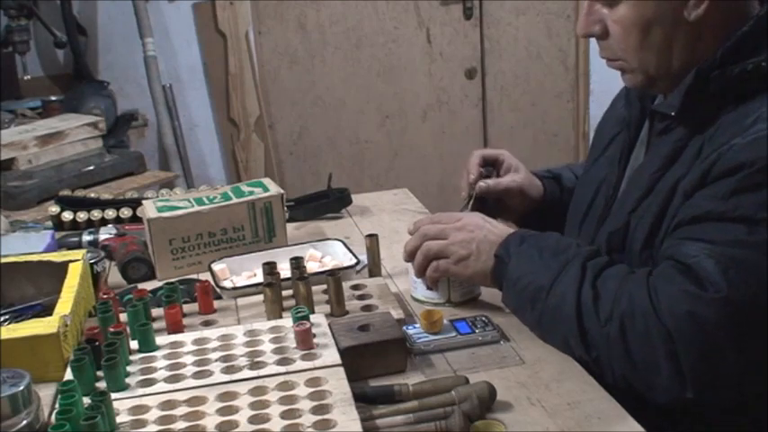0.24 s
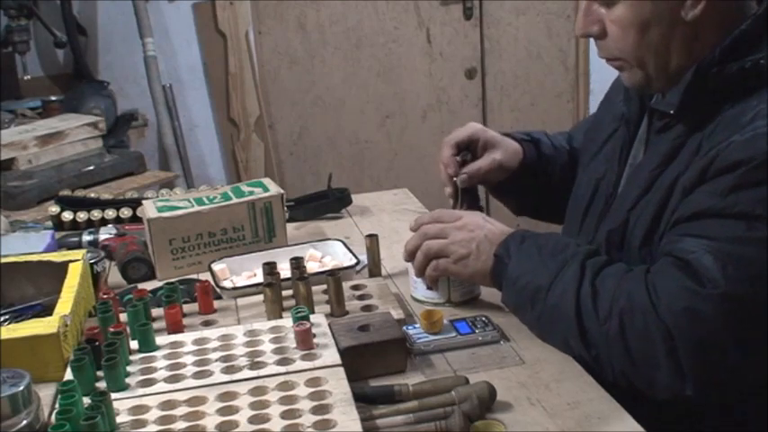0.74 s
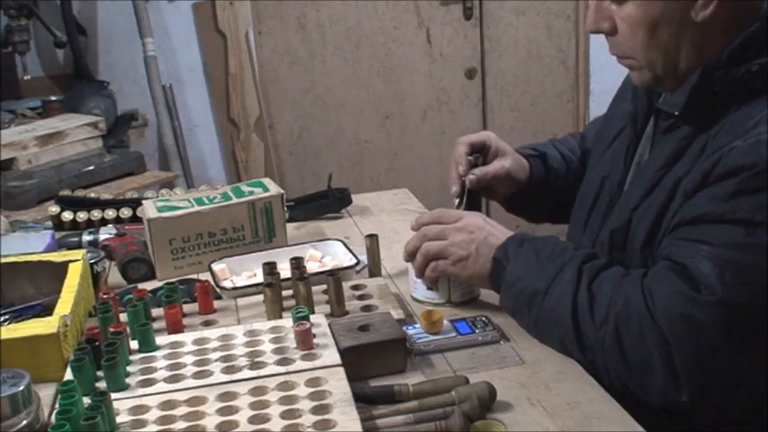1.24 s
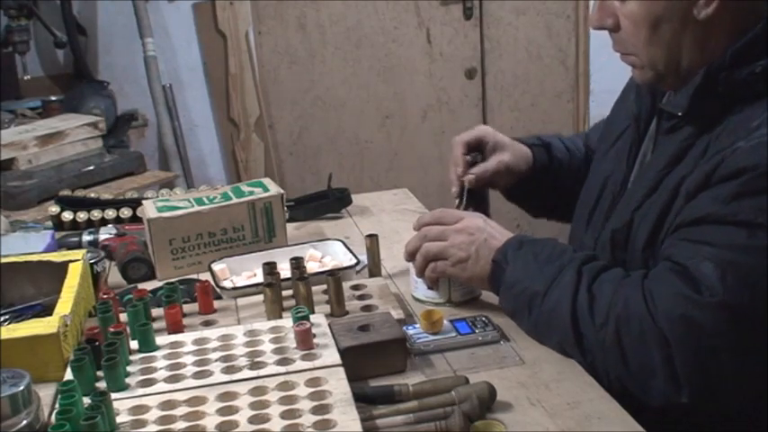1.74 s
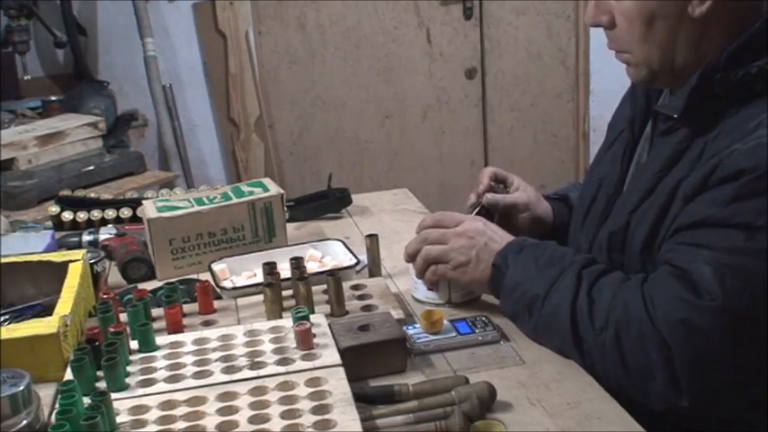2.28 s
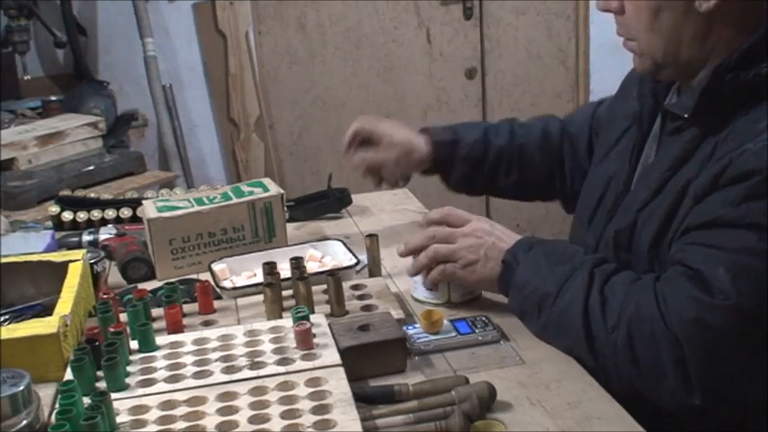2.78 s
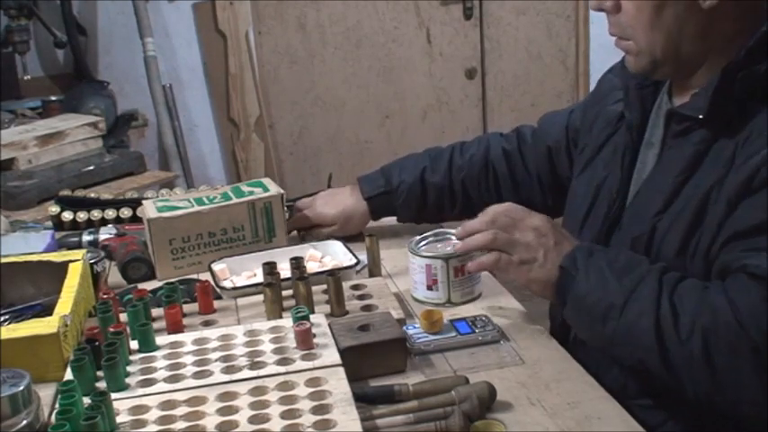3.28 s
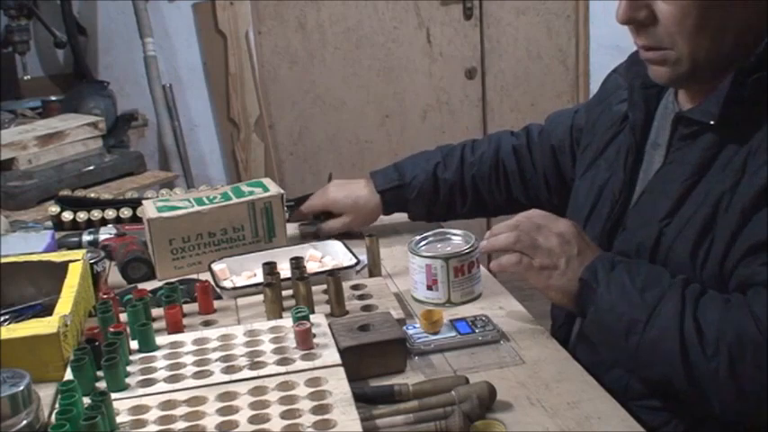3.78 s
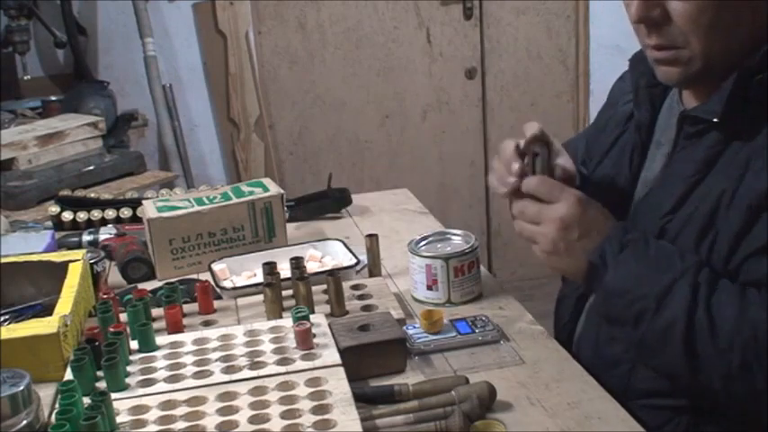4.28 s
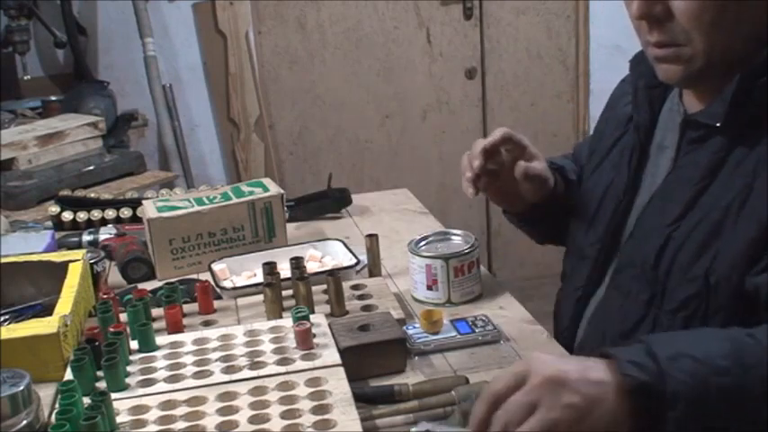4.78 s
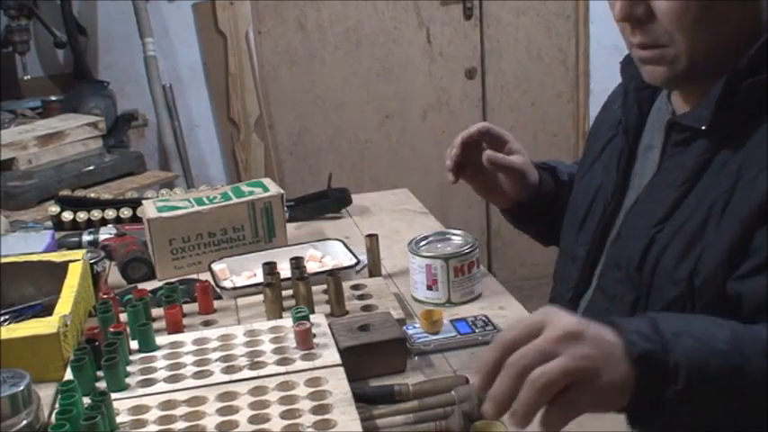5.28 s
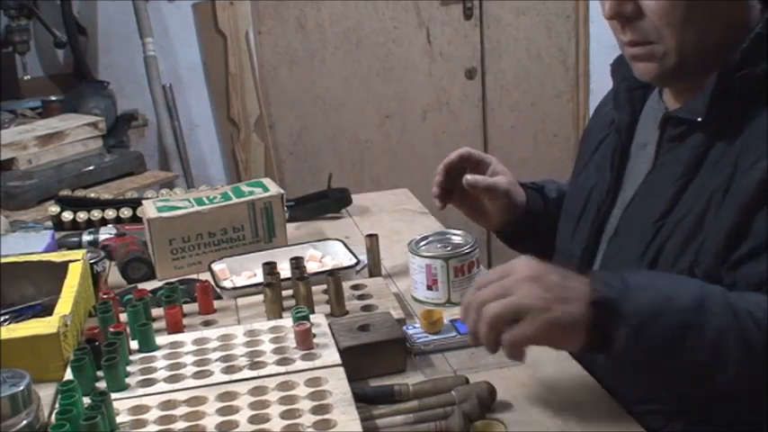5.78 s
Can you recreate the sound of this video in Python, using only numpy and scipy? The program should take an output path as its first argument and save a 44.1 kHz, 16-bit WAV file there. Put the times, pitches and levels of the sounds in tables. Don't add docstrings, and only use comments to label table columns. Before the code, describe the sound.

In a small workshop, heard by a camcorder about two metres away, a knife blade pries at a tin lid. A bright metallic snap at 0.1 s is followed by a duller lid bump at 0.2 and a lower snap at 0.43; the blade ring is quickly choked. Faint touches and scrapes lead to another ringing slip and bump at 1.5-1.6, soft skids at 1.8, and the hardest crack and hollow bump at 2.05-2.1. A weak double clink rings thinly at 2.5. A quilted sleeve rustles, louder by 3 s. The knife lands on wood at 3.17, 3.38 and 3.6, each knock rocking briefly. Cloth swishes from 4.05 to 4.5, ending with tiny clasp ticks. A wooden tool lands nearer at 5.08, its other end at 5.23. Soft rustling, room tone, hiss and a faint machine whine continue, extra thin tones joining after 4.6.

```python
import sys
import numpy as np
from scipy import signal
from scipy.fft import rfft, irfft, next_fast_len
from scipy.io import wavfile
from scipy.ndimage import uniform_filter1d

SR = 44100
rng = np.random.default_rng(int(sys.argv[2]) if len(sys.argv) > 2 else 0)


def to_wav(sig):
    pcm = np.clip(np.atleast_2d(sig), -1, 1) * 32767
    pcm = np.round(pcm).astype(np.int16)
    wavfile.write(sys.argv[1], SR, pcm.T)


def volts(x):
    e = np.asarray(x, float) / 20
    return 10 ** e


N = 266275
TAIL = 32768

# hz, side_minus_mid_db
ROOM_SIDE = [(25, -36), (60, -25.5), (110, -20.5), (200, -16.5), (380, -21.5), (700, -7), (1290, -20.5),
             (2380, -7.5), (4400, -16.5), (8120, -14), (15000, -24.5)]
# start_s, peak_db, rocking_db
FAR_DROPS = [
    (3.172, -12, -30),
    (3.376, -7, -23.5),
    (3.606, -6.5, -16.5),
]


def on_log(hz, table):
    at_hz, value = np.transpose(table)
    return np.interp(np.log(hz + 1), np.log(at_hz), value)


def unit(x):
    return x / np.sqrt(np.mean(x ** 2))


def noise(colour):
    size = next_fast_len(N)
    spectrum = rfft(rng.standard_normal(size))
    gain = volts(on_log(np.fft.rfftfreq(size, 1 / SR), colour))
    return unit(irfft(spectrum * gain, size)[:N])


def walk(rate_hz):
    hold = int(SR / rate_hz)
    steps = np.repeat(rng.standard_normal(N // hold + 1), hold)
    return unit(uniform_filter1d(uniform_filter1d(steps, hold), hold)[:N])


def add(track, start_s, x):
    i = int(start_s * SR)
    track[i:i + len(x)] += x[:N - i]


def even(x, size):
    spectrum = rfft(x)
    return spectrum / np.sqrt(uniform_filter1d(np.abs(spectrum) ** 2, size))


def room(dry, direct_db, early_db, early_t60_s):
    # hz, t60_s
    room_t60 = [(60, 1), (150, 0.34), (400, 0.31), (1000, 0.34), (2500, 0.33), (6000, 0.31), (13000, 0.26)]
    t, hz = np.arange(TAIL) / SR, np.fft.rfftfreq(TAIL, 1 / SR)
    echo = np.zeros((2, TAIL))
    for centre_hz in 60 * 2. ** np.arange(9):
        share = np.clip(1 - np.abs(np.log2((hz + 1) / centre_hz)), 0, 1)
        band = irfft(rfft(rng.standard_normal((2, TAIL))) * share)
        band[1] *= volts(on_log(centre_hz, ROOM_SIDE))
        late = volts(-60 * t / on_log(centre_hz, room_t60))
        early = volts(early_db - 60 * t / early_t60_s)
        build_up = 1 - np.exp(-t * centre_hz / 1.3)
        echo += band * (late + early) * build_up
    echo[0] = irfft(even(echo[0], size=40)) * np.std(echo[0]) * np.sqrt(TAIL)
    echo[:, TAIL // 2:] = 0
    echo /= np.sqrt(np.sum(echo[0] ** 2))
    echo[0, 0] = volts(direct_db)
    mid, side = signal.fftconvolve(dry[None], echo, axes=1)[:, :N]
    return np.array([mid + side, mid - side])


def blows(rows, body, gain_db, bump_db):
    rise_s = 0.0008
    size = 4096
    out, hz, t = np.zeros(N), np.fft.rfftfreq(size, 1 / SR), np.arange(size) / SR
    for start_s, db, treble_db, bass_db, peak_hz, ms in rows:
        colour_db = on_log(hz, body) + bump_db * np.exp(-np.log2((hz + 1) / peak_hz) ** 2 / 0.18)
        tilt = [(250, bass_db + 22.0), (450, 0.01), (1800, 0.016),
                (3000, treble_db + 27.5), (14000, 1.19 * (treble_db + 27))]
        colour_db += on_log(hz, tilt)
        cepstrum = irfft(np.log(volts(colour_db)))
        cepstrum[1:size // 2] *= 2
        cepstrum[size // 2:] = 0
        envelope = np.minimum(t / rise_s, 1) * np.exp(-1000 * t / max(ms, .3))
        grit = rng.standard_normal(size) ** 3 * envelope
        crunch = irfft(even(grit, size=3) * np.exp(rfft(cepstrum)))[:3500]
        add(out, start_s, crunch * volts(db + gain_db) / np.sqrt(np.sum(crunch ** 2)))
    return out


def ring(modes, strikes, rise_s, choke_s=1):
    out, t = np.zeros(N), np.arange(TAIL) / SR
    hz, db, t60_s = np.transpose(modes)[:, :, None]
    waver_db = 2 * np.resize(walk(45), (len(modes), TAIL))
    sines = volts(db + waver_db - 60 * t / t60_s) * np.sin(2 * np.pi * hz * t)
    choke = volts(-18 * np.clip((t - choke_s) / 0.0061, 0, 1))
    sound = sines.sum(axis=0) * (1 - np.exp(-t / rise_s)) * choke
    for start_s, strike_db in strikes:
        add(out, start_s, volts(strike_db) * sound)
    return out


def floor():
    # hz, level_db
    hiss = [(12, -27.5), (20, -8), (50, 7), (96, -9.5), (248, -5), (513, -6.5), (624, -11.5), (897, -7.5),
            (976, -5.5), (1440, -7), (12800, -24), (14700, -19.5), (16000, -47.5)]
    hiss_db = -62
    side_colour = [(hz, db + on_log(hz, ROOM_SIDE)) for hz, db in hiss]
    side = noise(side_colour) * volts(hiss_db - 9.5)
    return noise(hiss) * volts(hiss_db - 7.5) + side * np.array([[1], [-1]])


def whine():
    # pitch_hz, rms_db
    steady_tones = [(770, -80), (910, -76), (1330, -99), (1513, -86.5), (1680, -92)]
    # pitch_hz, rms_db
    late_tones = [(1147, -81), (2420, -84.5), (2550, -85)]
    late_start_s, fade_in_s = 4.6, 0.14
    t = np.arange(N) / SR

    def tone(hz, db):
        level = np.sqrt(2) * volts(db + 3 * walk(30))
        return level * np.sin(2 * np.pi * hz * t + walk(25))

    late = np.clip((t - late_start_s) / fade_in_s, 0, 1)
    return sum(tone(*row) for row in steady_tones) + late * sum(tone(*row) for row in late_tones)


def sleeve():
    # time_s, swish_db
    arms = [(0.0, -72), (0.09, -73), (0.7, -88.5), (0.94, -75.5), (1.5, -77.5), (2.6, -74), (2.86, -67.5),
            (3.16, -63), (3.95, -72), (4.064, -63.5), (4.49, -63), (4.78, -74), (4.99, -74.5), (5.06, -69),
            (5.74, -78), (6.04, -74)]
    # hz, db_per_hz
    cloth_colour = [(710, -24), (1200, 0), (1910, -2.5), (2060, -1), (7870, -3), (9930, -8.5),
                    (11900, -5.5), (15000, -13)]
    t = np.arange(N) / SR
    swish_db = np.interp(t, *np.transpose(arms))
    dying_away = volts(-51 - 60 * t / 0.33)
    pressure = volts(-70 + 0.4 * (swish_db + 72)) + dying_away
    side = volts(-17) * np.outer([1, -1], noise(cloth_colour))
    cloth = noise([(300, -24.5)] + cloth_colour) + side
    swish = cloth * volts(swish_db + 0.97 * walk(37) + 0.42 * walk(200) + 1.5)
    rub = noise([(80, -28.5), (300, 5), (900, 8.5), (2000, -7.0), (4000, -47.0)])
    return swish + rub * pressure * volts(2.0 * walk(52) - 5.0)


def tin():
    # hz, db_per_hz
    tin_body = [(40, -29), (100, -25.5), (172, -15), (230, -18.5), (290, -4), (600, -5.5), (1200, -1.5),
                (1700, -3.5), (2300, -18.5), (4000, -24), (5700, -23.5), (7600, -27), (10000, -35.5),
                (15000, -43)]
    # start_s, peak_db, treble_db, peak_hz
    rim_slips = [
        (0.097, -6, -5.5, 1790),
        (0.43, -11, -21, 1150),
        (1.513, -7, -22.5, 1640),
        (2.053, -3.5, -19, 1590),
    ]
    # start_s, peak_db, treble_db, peak_hz
    lid_bumps = [
        (0.197, -11.5, -19, 470),
        (0.932, -37.5, -33, 645),
        (0.974, -37, -31.5, 480),
        (1.449, -48, -23, 697),
        (1.591, -18, -20.5, 480),
        (1.852, -24.5, -26.5, 507),
        (2.084, -3, -23.5, 484),
        (2.469, -29.5, -22.5, 1700),
        (2.475, -27.5, -21, 995),
    ]
    # start_s, peak_db, treble_db, peak_hz
    chatter = [(0.104, -12, -0.5, 1650), (0.609, -36.5, -20, 555), (0.644, -39, -20, 572),
               (1.339, -45.5, -37, 680), (1.519, -27, -4, 474), (1.596, -27, -13, 486),
               (1.805, -31, -25, 700), (1.831, -29.5, -20.5, 519), (1.86, -51, -4.5, 479),
               (1.901, -46, -28, 1150), (2.008, -38.5, -14.5, 1170), (2.06, -13, -35.5, 472),
               (2.094, -15.5, -19.5, 484), (2.299, -41, -13.5, 446), (2.48, -31.5, -1.5, 590)]

    def bass_db(db):
        return -2 - 0.63 * (db + 40)

    snaps = [(s, db, treble_db, -36.5, hz, 4.4) for s, db, treble_db, hz in rim_slips]
    bumps = [(s, db, treble_db, bass_db(db), hz, 4.2) for s, db, treble_db, hz in lid_bumps]
    skids = [(s, db, treble_db, bass_db(db), hz, 13.7) for s, db, treble_db, hz in chatter]
    return blows(snaps + bumps, tin_body, 11.4, 8.9) + blows(skids, tin_body, 13.5, 19.7)


def metal():
    # pitch_hz, level_db, t60_s
    lid_modes = [(447, -10.5, .2), (485, -0.5, 0.57)]
    wall_modes = [(791, 0, .55)]
    rim_modes = [(1075, -10.5, .12), (1320, -16, .12), (1425, -8.5, .12), (1508, 4, 0.32), (1635, -7, 0.18),
                 (1660, -7, .16), (1910, -7.5, .2), (2069, -11, 0.091), (2360, -14, .15), (2684, -16, 0.15)]
    bench_modes = [(98, -14, .25), (172.4, -10, .33), (286, 0, .2)]
    # start_s, lid_db, wall_db, rim_db, bench_db
    slips = [(.098, -35.5, -45, -37.5, -58), (0.199, -31.5, -53, -42, -35.5), (.431, -49, -49, -48, -50),
             (.974, -52, -65.5, -73, -59.5), (1.514, -27.5, -32.5, -27.5, -55),
             (1.591, -34, -59, -71, -34.5), (1.805, -56, -70, -69.5, -53), (1.853, -46, -60.5, -65, -53),
             (2.053, -40.5, -59, -27, -47), (2.085, -27, -42.5, -31, -33), (2.3, -57.5, -92, -74, -74),
             (2.475, -53, -65, -58, -70), (3.85, -52.5, -78, -67, -56)]
    # pitch_hz, level_db, t60_s
    blade_modes = [
        [(3654, 0, .3), (5507, -8, .15), (5652, -7, .2), (5900, -5, .12), (6783, -10, .18), (7234, 3, .2),
         (8403, -15, .3)],
        [(3957, -6, .2), (4366, -2, .3), (5889, 2, .17), (6051, -1, .2), (6309, -6, .24), (7031, -6, .22)],
        [(3650, 0, .5), (4463, -7, .2), (6228, -8, .12), (7250, -10, .3)],
        [(5380, 5, .14), (5470, 2, .25), (5523, 2, .28), (5600, 5, .14), (3650, -5, .38), (6955, -11, .3),
         (7208, -8, .25), (4430, -12, .35)],
        [(5496, 4, .08), (5640, 2, .07), (4323, -14, .35), (7601, -4, .1), (2902, -6, .2)],
        [(1745, 6, .25), (2245, -5, .3), (3628, -5, .66), (4384, -7, .3), (4424, -8, .3), (5496, -6, .3),
         (6850, -12, .15), (7176, -17, .2), (9270, -15, .13), (10890, -16, .22)],
    ]
    # start_s, level_db, choke_s
    grips = [
        (.100, -21.5, .097),
        (.198, -40.5, .3),
        (1.514, -43.5, 0.21),
        (1.594, -49, 0.24),
        (2.053, -30, .3),
        (2.476, -46.5, 0.47),
    ]
    start_s, *parts_db = np.transpose(slips)
    parts = (lid_modes, wall_modes, rim_modes, bench_modes)
    chokes_s = (0.067, 1, 1, 1)
    out = np.zeros(N)
    for modes, db, choke_s in zip(parts, parts_db, chokes_s):
        out += ring(modes, zip(start_s, db), 0.00057, choke_s)
    for modes, (grip_s, db, choke_s) in zip(blade_modes, grips):
        out += ring(modes, [(grip_s, db)], 0.009, choke_s)
    return out


def ticks():
    # start_s, peak_db, contact_ms
    clasp_ticks = [
        (2.0218, -55, 0.96),
        (2.798, -51, 7),
        (4.4738, -48, 5.1),
        (4.4994, -68, 6),
        (4.5294, -60, 6),
    ]
    rows = [(s, db, -25, -20, 9000, ms) for s, db, ms in clasp_ticks]
    return blows(rows, [(1500, -19), (3500, -4.5), (8000, 9.0), (14000, -2.0)], 18.3, 0)


def far_knocks():
    # hz, db_per_hz
    far_board = [(40, -53), (80, -54), (135, -15), (210, -18), (270, -5.5), (520, 0), (950, -4.5),
                 (1600, -12), (2200, -22), (3000, -18.5), (3700, -28.5), (4300, -28.5), (8000, -43.5),
                 (15000, -109)]
    # lag_s, level_db
    rocking = [
        (.02, -1.5),
        (0.048, 0),
        (.082, -5),
    ]
    # start_s, peak_db
    touches = [
        (3.344, -32.5),
        (3.366, -32.5),
        (3.851, -41),
        (3.888, -44.5),
    ]
    treble_db, bass_db = -28.5, -20
    small = [(s + lag_s, db + less_db) for s, _, db in FAR_DROPS for lag_s, less_db in rocking] + touches
    rows = [(s, db, treble_db, bass_db, 977, 2) for s, db, _ in FAR_DROPS]
    rows += [(s, db, treble_db, bass_db, 470, 1.8) for s, db in small]
    return blows(rows, far_board, 14.86, 5.4)


def plank():
    # pitch_hz, level_db, t60_s
    plank_modes = [(428, -4, 0.18), (504.4, -1, 0.29), (592, -1.5, 0.21), (934, 0.5, 0.35), (990, -4, 0.12),
                   (3017, -15, 0.12)]
    return ring(plank_modes, [(s, db - 20.5) for s, db, _ in FAR_DROPS], 0.00086)


def near_knocks():
    # hz, db_per_hz
    near_board = [(35, -55.5), (60, -25), (257, -4.5), (317, 4), (381, -11.5), (428, -2), (1010, -3.5),
                  (1670, -6), (2310, -19.5), (15000, -58)]
    # start_s, peak_db, peak_hz
    landings = [
        (5.073, -14.5, 420),
        (5.079, -12, 570),
        (5.112, -28, 1000),
        (5.23, -20.5, 1600),
        (5.235, -14, 1100),
    ]
    rows = [(s, db, -24, -25.5, hz, 7.4) for s, db, hz in landings]
    return blows(rows, near_board, 15.4, 2.5)


def scene():
    rings = metal()
    at_tin = room(tin() + ticks() + volts(-11.5) * rings, -2.0, 4.25, 0.037) + rings
    at_tin = at_tin * volts(np.array([[.3], [-.3]]))
    far = room(far_knocks(), -5.5, 3.9, 0.046)
    near = room(near_knocks(), -2, 6.2, 0.011)
    return at_tin + far + near + plank() + sleeve() + whine() + floor()


def low_pass(x):
    return signal.sosfilt(signal.butter(12, 16410, fs=SR, output="sos"), x)


def record(dry):
    ceiling, top_hz = 0.36, 15500
    low_cut = signal.butter(2, 45., "high", fs=SR, output="sos")
    top_cut = signal.ellip(8, .2, 60, top_hz, fs=SR, output="sos")
    rounded = ceiling * np.tanh(dry / ceiling)
    mix = signal.sosfilt(np.vstack([low_cut, top_cut]), rounded)
    return low_pass(mix)


dry = scene()
out = record(dry)
to_wav(out)
```